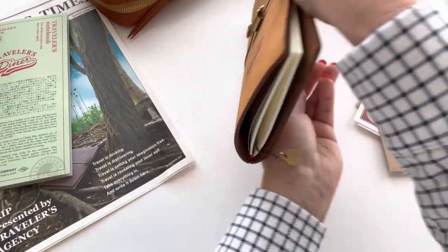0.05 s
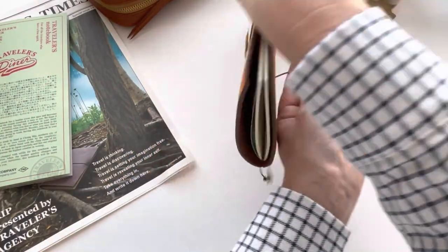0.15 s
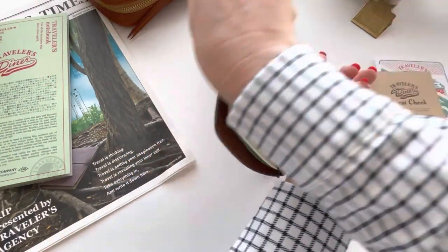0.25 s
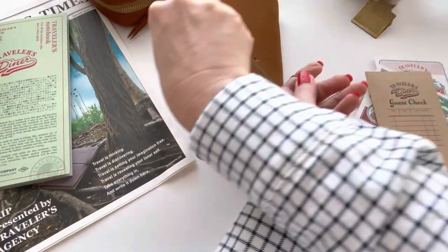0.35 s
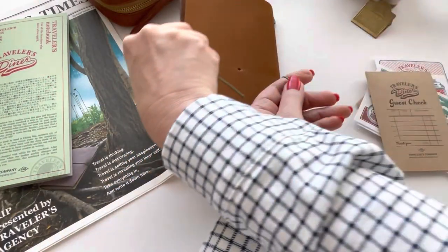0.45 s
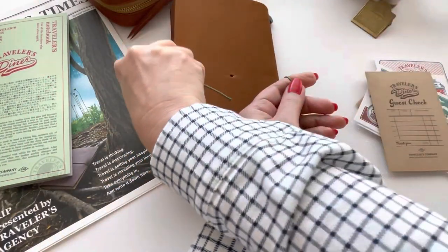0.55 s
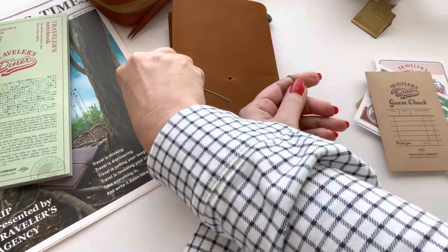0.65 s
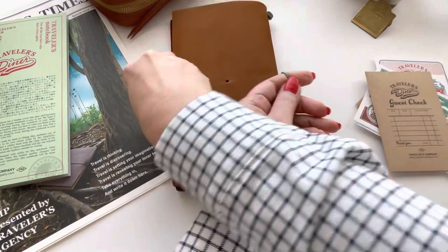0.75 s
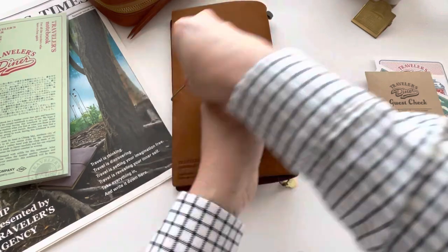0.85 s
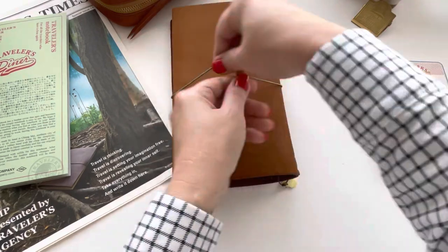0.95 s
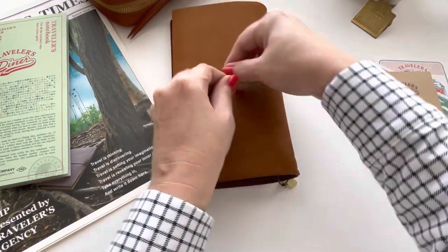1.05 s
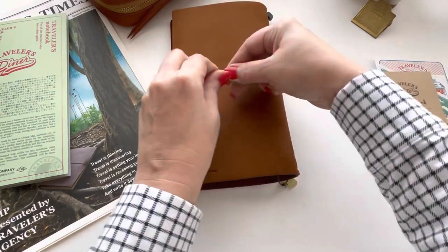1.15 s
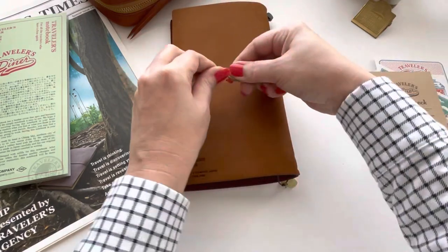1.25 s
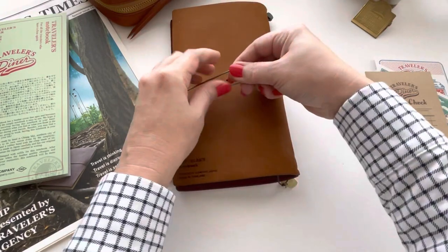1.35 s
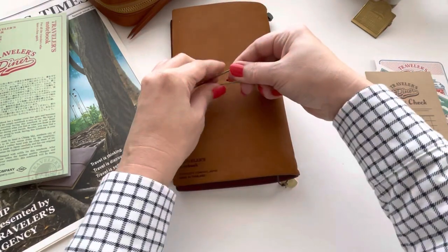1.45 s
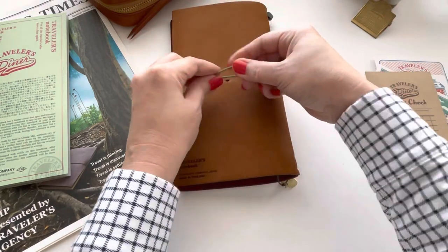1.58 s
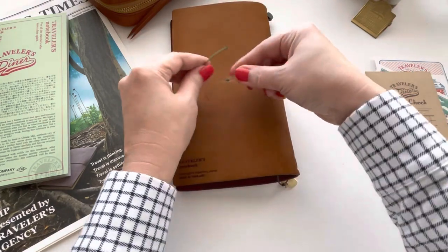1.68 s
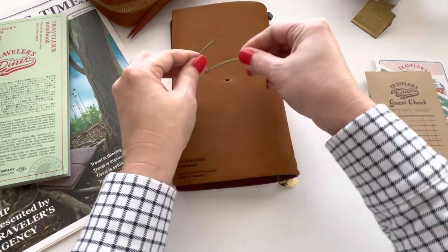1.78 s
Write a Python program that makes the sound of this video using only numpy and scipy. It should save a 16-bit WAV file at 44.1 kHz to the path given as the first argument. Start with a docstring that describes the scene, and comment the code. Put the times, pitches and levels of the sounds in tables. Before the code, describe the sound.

A leather notebook is laid on a table, close up in a small quiet room. Sleeves brush at 0.15-0.2 s, then rattling knocks cluster from 0.21 to 0.35 s with a low table thud and palm rubbing, settling by 0.5 s. Around 0.7-0.75 s a hand slaps and presses the cover softly. Faint cord rubs follow near 0.93 s, tiny ticks near 1.1, thin slides at 1.55-1.8, over steady low room tone.

```python
"""A small quiet room, heard close up: a leather notebook is turned over and laid on a table.
Sleeves brush, its edge knocks and it settles; a hand slaps the cover and presses it down with a soft thud,
then fingers rub and tick along the elastic cord. Contacts are pushes with short rattles, spread by bending waves;
the knocks ring the table, thuds are its low modes, rubbing is slip-roughened noise.
The room answers the contacts and rubbing, and a steady room tone lies underneath."""
import sys
import numpy as np
from scipy import signal
from scipy.fft import rfft, irfft, next_fast_len
from scipy.io import wavfile

SR = 44100
rng = np.random.default_rng(int(sys.argv[2]) if len(sys.argv) > 2 else 0)


def bounce(signal):
    """Save signal as a 16-bit WAV file at the path given by the first command-line argument."""
    frames = np.transpose(np.atleast_2d(signal))
    limited = np.clip(frames, -1, 1)
    pcm = np.round(limited * 32767).astype(np.int16)
    wavfile.write(sys.argv[1], SR, pcm)


N = 79380  # samples
TOP_HZ = 16300  # band limit


def amp(db):
    """Decibels to gain."""
    return 10 ** (np.asarray(db) / 20)


def unit(x):
    """Scale to rms 1."""
    return x / np.sqrt(np.mean(x ** 2) + 1e-20)


def along(points, hz):
    """Read a curve of (hz, value) points on a log frequency axis."""
    point_hz, value = np.transpose(points)
    return np.interp(np.log(hz + 1), np.log(point_hz + 1), value)


def filtered(x, response):
    """Filter x by a complex response of frequency, zero-padded to keep the end off the start."""
    n = x.shape[-1]
    padded = 2 * next_fast_len(n)
    spectrum = rfft(x, padded) * response(np.fft.rfftfreq(padded, 1 / SR))
    return irfft(spectrum, padded)[..., :n]


def causal(db):
    """Minimum-phase response with these gains, so that the sound starts at once."""
    cepstrum = irfft(db * np.log(10) / 20)
    half = len(cepstrum) // 2
    cepstrum[1:half] *= 2
    cepstrum[half + 1:] = 0
    return np.exp(rfft(cepstrum))


def noise(n):
    """White stereo noise whose left-right likeness depends on frequency, split as mid and side."""
    # left-right correlation: hz, likeness (1 = mono)
    likeness = [(30, 0.54), (120, 0.89), (300, 0.61), (600, 0.4), (1200, 0.53), (2200, 0.11), (4500, 0.1),
                (8000, 0.13), (14000, 0.62)]

    def mid_side_gains(hz):
        angle = np.arccos(np.clip(along(likeness, hz), -1, 1)) / 2
        return np.array([np.cos(angle), np.sin(angle)])

    mid, side = filtered(rng.standard_normal((2, n)), mid_side_gains)
    return np.array([mid + side, mid - side])


def add(out, start_s, x):
    """Mix x into out at its start time."""
    i = max(0, round(start_s * SR))
    out[:, i:i + x.shape[-1]] += x[..., :N - i]


def body(hz):
    """Gain in dB of the broad resonances of notebook and table top."""
    # resonances: centre_hz, width_hz, peak_db
    resonances = [(377, 130, 3), (727, 47, 2), (850, 120, 9), (980, 50, 3), (1130, 90, 0), (1395, 110, 5),
                  (1550, 60, 3), (1836, 42, 1), (3190, 160, 4.5), (3540, 300, 5)]
    return sum(db / (1 + (2 * (hz - centre) / width) ** 2) for centre, width, db in resonances)


def contacts(rows, colour, gain_db, rattle_db, tick_t60, dull_hz):
    """A push and a short rattle of cover and pages, spread by bending waves whose low notes arrive later."""
    # level bands, bass to tick: low_hz, high_hz
    bands = [(90, 250), (250, 600), (600, 1200), (1200, 2500), (2500, 7000), (7000, 16000)]
    low_hz, high_hz = np.transpose(bands)
    centre_hz = np.sqrt(low_hz * high_hz)
    width_db = 10 * np.log10(2 * (high_hz - low_hz) / SR)  # each band's share of a white push
    out, t = np.zeros((2, N)), np.arange(SR // 4) / SR

    def dull(hz):
        return 1 / (1 + (hz / dull_hz) ** 4)

    def bright(hz):
        return 1 - dull(hz)

    for start_s, *levels_db, rattle_t60, bend_s in rows:
        rattle = 0
        for band, t60 in [(dull, rattle_t60), (bright, tick_t60)]:
            rattle = rattle + filtered(noise(len(t)), band) * unit(amp(-60 * t / t60))
        rattle = rattle / np.sqrt(len(t))
        push = t == 0
        force = (push + amp(rattle_db) * rattle) / np.hypot(1, amp(rattle_db))
        shape = np.c_[centre_hz, np.array(levels_db) - width_db]

        def response(hz):
            # delay grows as 1 / sqrt(hz), counted from the arrival of the band limit
            path = np.sqrt(1000 * hz) - hz * np.sqrt(1000 / TOP_HZ) / 2
            bend = np.exp(-4j * np.pi * bend_s * path)
            return causal(along(shape, hz) + along(colour, hz) + body(hz)) * bend

        add(out, start_s, filtered(force, response))
    return amp(gain_db) * out


def notebook_knocks():
    """The notebook strikes the table: rattling contacts with a very short tick on top."""
    # contacts: start_s, then bass_db, low_body_db, body_db, mid_db, treble_db, tick_db before colour and gain,
    # rattle_t60_s, bend_s (bending delay at 1 kHz, before the band limit's own delay is taken off)
    knocks = [(.2125, -55.5, -45, -35, -34.5, -58.5, -56.5, 0.02, 0.0011),
              (.2149, -60, -30, -35.5, -33.5, -57, -50, 0.087, 0.00049),
              (.2598, -42.5, -31.5, -27.5, -32.5, -52, -47, 0.083, .0007),
              (.2854, -36.5, -44, -41, -41.5, -46.5, -49, 0.017, 0.00082),
              (.2886, -46, -28.5, -37.5, -26.5, -35, -50.5, 0.02, 0.00025),
              (.2958, -40.5, -39.5, -33, -33, -44.5, -68, 0.017, 0.00048),
              (.343, -37, -34.5, -55.5, -39, -53.5, -99, 0.1, 0.001),
              (.4268, -50.5, -51, -50, -43.5, -67.5, -91, 0.085, 0.0006),
              (.475, -60, -60, -51, -57.5, -86, -92, 0.059, 0.00056),
              (.519, -47, -69, -61, -60, -78, -87, 0.054, 0.00109),
              (.7414, -46.5, -49.5, -49.5, -45, -68.5, -74, 0.02, 0.0015)]
    # colour shared by the knocks: hz, gain_db
    knock_colour = [(30, -36), (100, -15.5), (170, -5), (400, -0.5), (1000, -3.5), (1700, 1), (2600, -4.5),
                    (3500, -2.5), (3900, -5), (4400, 5.5), (5500, -1), (7500, -7), (11000, -7),
                    (14500, 3.5)]
    return contacts(knocks, knock_colour, gain_db=31, rattle_db=9.5, tick_t60=0.0043, dull_hz=6540)


def ringing(x):
    """Narrow resonances of the table, driven by x, ring on after it."""
    # resonances: pitch_hz, level_db, t60_s
    rings = [(197, 5.5, 0.41), (242.4, 3, .5), (432.6, -2.5, 0.2), (547, -4, .3), (674, 1.5, .3),
             (814.2, 0.5, .25), (910, -5, 0.34), (978, 0.5, .3), (1283, -2.5, 0.31), (1557, -3.5, 0.2),
             (1694, -3.5, 0.13), (1831, -1, 0.18)]

    def response(hz):
        total = 0
        for pitch, db, t60 in rings:
            width = np.log(1000) / np.pi / t60  # Hz
            drive = 1j * hz * width
            total = total + amp(db) * drive / (pitch * pitch - hz * hz + drive)
        return total

    return filtered(x, response)


def thuds(attack_s):
    """Low modes of the table top swell and die as weight comes down on it."""
    # weight coming down: start_s, level_db (scales the modes)
    weights = [(0.238, -36.5), (0.267, -49), (0.349, -42.5), (0.7516, -34)]
    # low modes of the table top: pitch_hz, level_db (within a thud), t60_s
    low_modes = [(90, -7, 0.24), (184.6, 8.5, 0.099), (375, -16, 0.1)]
    out, t = np.zeros((2, N)), np.arange(SR // 2) / SR
    swell = 1 - np.exp(-t / attack_s)
    ring = sum(amp(db - 60 * t / t60) * np.sin(2 * np.pi * pitch * t) for pitch, db, t60 in low_modes)
    for start_s, level_db in weights:
        add(out, start_s, amp(level_db) * ring * swell)
    return out


def finger_taps():
    """Fingers tick on cover and cord: contacts with push and rattle equally strong."""
    # contacts: start_s, then bass_db, low_body_db, body_db, mid_db, treble_db, tick_db before colour and gain,
    # rattle_t60_s, bend_s (bending delay at 1 kHz, before the band limit's own delay is taken off)
    taps = [(.7139, -71, -55, -48, -57.5, -46.5, -51, 0.015, 0.00033),
            (.7268, -48.5, -53.5, -64, -52.5, -53.5, -46, 0.075, .0002),
            (.7372, -61, -73, -50, -63, -62, -87, 0.016, 0.00043),
            (.788, -56.5, -79, -60, -63, -70, -86, 0.01, 0.00038),
            (1.067, -79, -66, -66, -73.5, -77, -82, 0.021, 0.00055),
            (1.119, -59, -64, -78, -87, -81, -88, 0.012, 0.00064)]
    # colour shared by the taps: hz, gain_db
    tap_colour = [(40, -22), (150, -4.5), (500, -4.5), (850, -3.5), (1600, 3), (3000, 0), (4700, -14),
                  (7000, 2), (11000, -15.5), (15000, -26)]
    return contacts(taps, tap_colour, gain_db=31.5, rattle_db=0, tick_t60=0.012, dull_hz=5900)


def rub(strokes, spectrum, rough_db, slips_per_s):
    """Friction: tiny uneven slips in coloured noise, under strokes that rise and fall by 20 dB in their times."""
    t, power = np.arange(N) / SR, np.zeros(N)
    for peak_s, db, rise_s, fall_s in strokes:
        away = np.where(t < peak_s, (peak_s - t) / rise_s, (t - peak_s) / fall_s)
        power += amp(db - 20 * 2 * away ** 2 / (1 + away)) ** 2
    unevenness = np.interp(t * slips_per_s, np.arange(N), rng.standard_normal(N))
    slips = amp(rough_db * unevenness)
    grain = filtered(noise(N) * slips, lambda hz: causal(along(spectrum, hz)))
    return np.sqrt(power) * unit(grain)


def sleeve_brush():
    """Sleeves brush: fine fast slips, strongest around 2 kHz."""
    # strokes: peak_s, level_db, rise_s, fall_s
    strokes = [(.185, -41.5, 0.052, 0.034), (.141, -51, 0.0088, .035)]
    # relative spectrum: hz, db_per_hz
    spectrum = [(300, -36.5), (800, -27.5), (1450, -7), (1850, -14.5), (2100, -3.5), (2350, 1),
                (2600, -9.5), (3100, -10.5), (4300, -24), (6000, -20), (12000, -25), (16000, -27)]
    return rub(strokes, spectrum, rough_db=-4, slips_per_s=1200)


def leather_rub():
    """Leather rubs: broad friction noise."""
    # strokes: peak_s, level_db, rise_s, fall_s
    strokes = [(.02, -62, 0.22, 0.19), (.722, -42.5, .016, 0.029), (.93, -62, 0.16, 0.036),
               (1.098, -70.5, 0.034, .03)]
    # relative spectrum: hz, db_per_hz
    spectrum = [(200, -11.5), (700, -8.5), (1500, -1.5), (2500, 0), (4000, -2.5), (7000, -5.5),
                (11000, -11.5), (16000, -9)]
    return rub(strokes, spectrum, rough_db=1.5, slips_per_s=600)


def palm_rub():
    """The palm rubs: slower slips, dark above 2.5 kHz."""
    # strokes: peak_s, level_db, rise_s, fall_s
    strokes = [(.243, -39.5, 0.0099, 0.023), (.31, -37.5, 0.039, 0.09), (.45, -52.5, 0.09, .1),
               (.59, -57, 0.053, 0.038), (.738, -44, 0.034, 0.012), (.93, -63.5, 0.35, 0.18),
               (1.095, -60, 0.063, 0.039), (1.18, -66.5, 0.076, 0.15)]
    # relative spectrum: hz, db_per_hz
    spectrum = [(80, -1.5), (350, 1.5), (900, 3.5), (1500, 2), (2500, -5), (4000, -19.5), (8000, -30.5),
                (16000, -39)]
    return rub(strokes, spectrum, rough_db=3.0, slips_per_s=400)


def cord_rub():
    """The elastic cord rubs: a thin hiss at the top of the treble."""
    # strokes: peak_s, level_db, rise_s, fall_s
    strokes = [(.19, -59.5, .065, .04), (.305, -63, .015, 0.032), (.87, -71.5, 0.068, 0.035),
               (.935, -58.5, 0.08, 0.033), (1.02, -75.5, 0.14, 0.11), (1.56, -63.5, 0.032, 0.027)]
    # relative spectrum: hz, db_per_hz
    spectrum = [(1000, -35), (6000, -30.5), (8500, -15), (12000, -19.5), (14500, -5.5), (15700, -4),
                (17000, -16)]
    return rub(strokes, spectrum, rough_db=1, slips_per_s=1130)


def fingertip_slides():
    """Fingertips slide along the cord: the roughest slips, peaking near 1.4 kHz."""
    # strokes: peak_s, level_db, rise_s, fall_s
    strokes = [(.684, -60, 0.033, 0.05), (.935, -57, 0.022, 0.015), (1.617, -64, 0.028, 0.033),
               (1.686, -65.5, .02, .035), (1.77, -71, 0.098, 0.086)]
    # relative spectrum: hz, db_per_hz
    spectrum = [(500, -34), (1000, -5), (1400, 10.5), (1800, 1.5), (2300, 5), (3200, -5.5), (4500, -17),
                (10000, -33), (16000, -16)]
    return rub(strokes, spectrum, rough_db=6.5, slips_per_s=500)


def room(x, delay_s):
    """The walls answer with a delayed noise tail; each frequency dies at its own speed."""
    # decay: hz, t60_s
    decay = [(100, 0.8), (400, 0.13), (1600, 0.27), (4000, 0.23), (9000, 0.28), (15000, 0.28)]
    # tail colour: hz, gain_db
    tail_colour = [(100, -2), (600, 3), (1600, -0.5), (5000, 1.5), (14000, -6.5)]
    hz, t, grains = signal.stft(noise(SR // 2), SR, nperseg=256)
    fading = grains * amp(-60 * t / along(decay, hz)[:, None])
    tail = signal.istft(fading, SR, nperseg=256)[1]
    tail = filtered(tail / np.linalg.norm(tail[0]), lambda f: amp(along(tail_colour, f)))
    tail = np.pad(tail, ((0, 0), (round(delay_s * SR), 0)))
    return signal.fftconvolve(x, tail, axes=1)[:, :N]


def room_tone(level_db):
    """Steady coloured noise of the quiet room, slightly stronger on the right."""
    # relative spectrum: hz, db_per_hz
    air = [(15, -57.5), (25, -35), (114, -5.5), (223, -13.5), (394, -15), (560, -18.5), (734, -22.5),
           (796, -25), (1290, -28.5), (1400, -36), (1650, -30.5), (2760, -31.5), (3160, -34.5),
           (10700, -39), (16000, -45)]
    tone = unit(filtered(noise(N), lambda hz: amp(along(air, hz))))
    return amp(level_db) * tone * amp([[-1.1], [1.1]])


def scene():
    """Handling, a little to the right, in the room and over its tone."""
    knocks = notebook_knocks()
    hands = knocks + ringing(knocks) + finger_taps()
    hands += sleeve_brush() + leather_rub() + palm_rub() + cord_rub() + fingertip_slides()
    room_db, pan_db = -11.5, -3.5  # pan is left over right
    near = hands + amp(room_db) * room(hands, delay_s=0.0074) + thuds(attack_s=0.009)
    near = near * amp([[pan_db / 2], [-pan_db / 2]])
    return near + room_tone(level_db=-64)


def record(dry):
    """A very steep low-pass at the band limit."""
    return filtered(dry, lambda hz: 1 / (1 + (hz / TOP_HZ) ** 120))


dry = scene()
out = record(dry)
bounce(out)
```